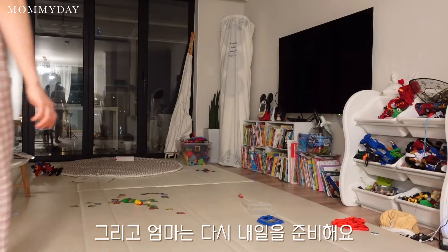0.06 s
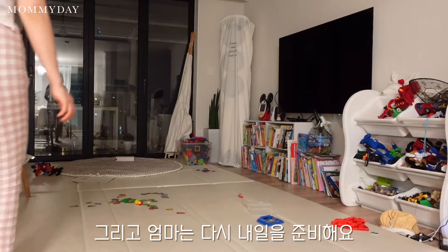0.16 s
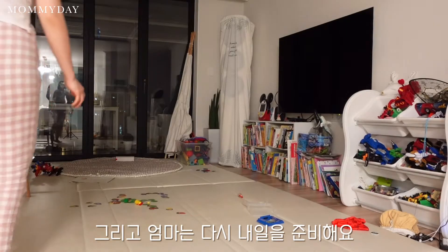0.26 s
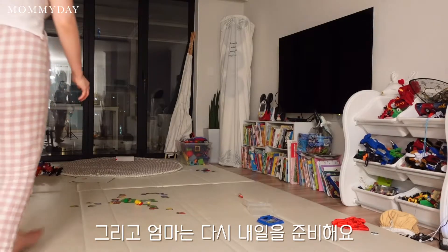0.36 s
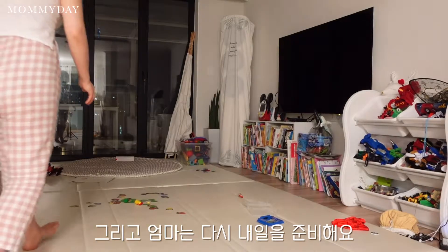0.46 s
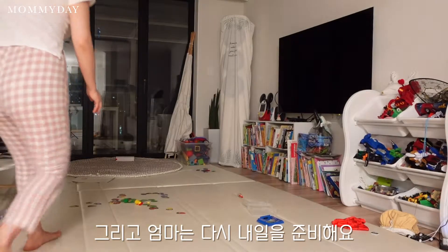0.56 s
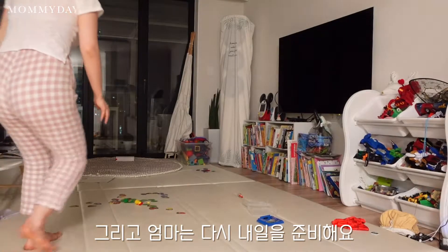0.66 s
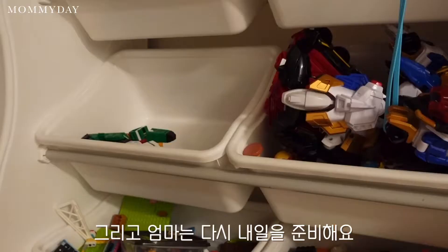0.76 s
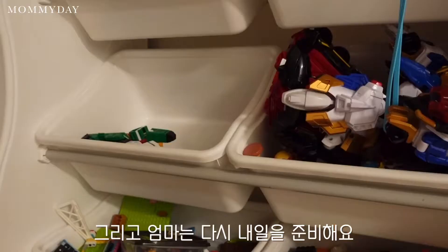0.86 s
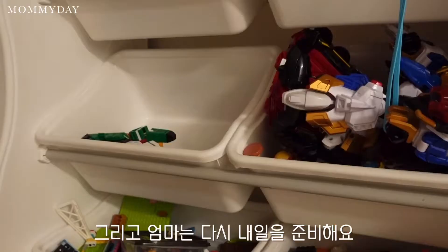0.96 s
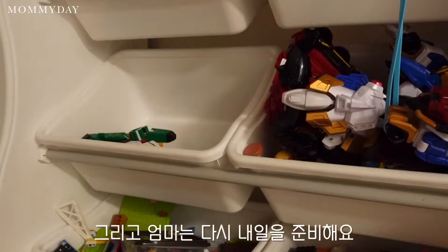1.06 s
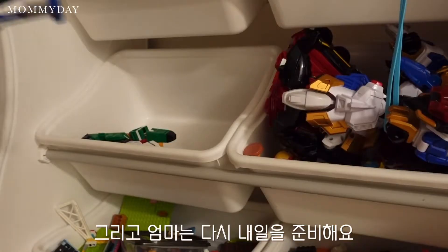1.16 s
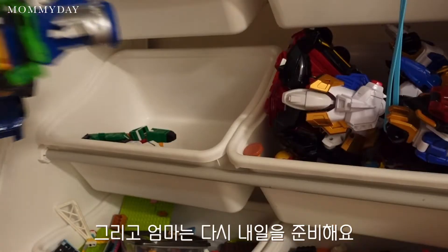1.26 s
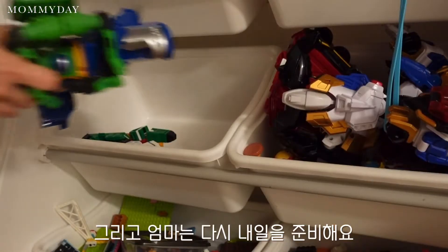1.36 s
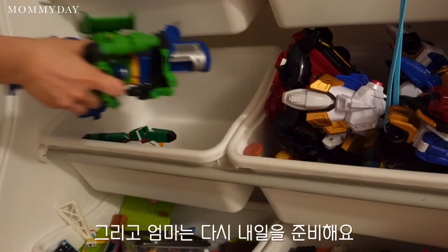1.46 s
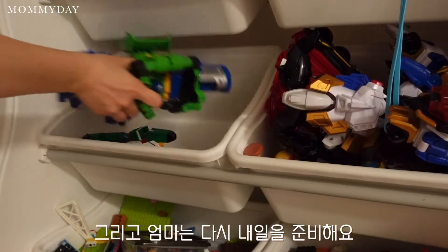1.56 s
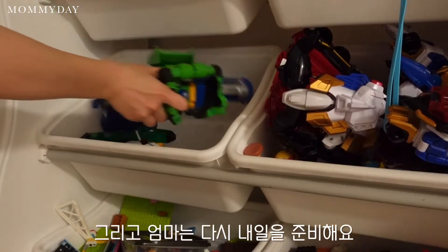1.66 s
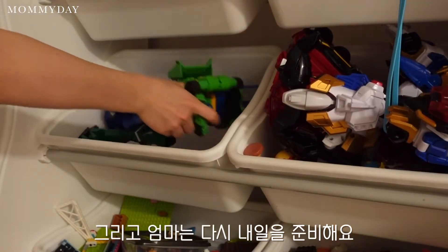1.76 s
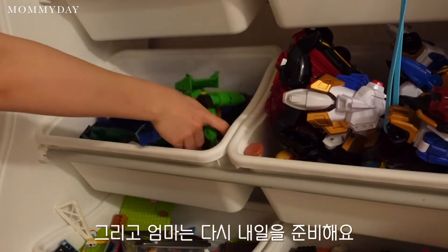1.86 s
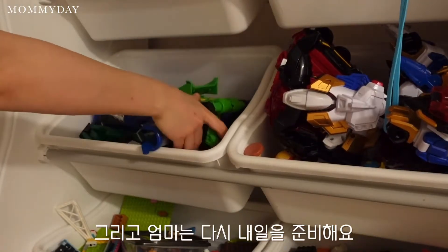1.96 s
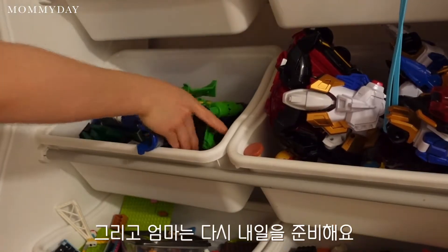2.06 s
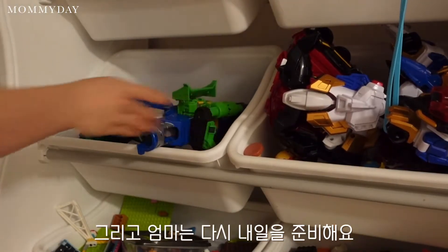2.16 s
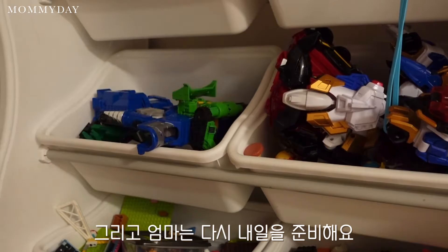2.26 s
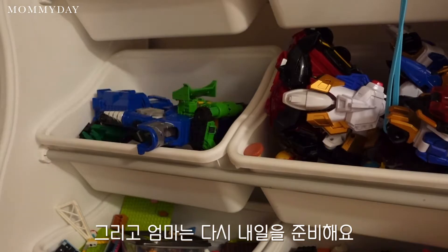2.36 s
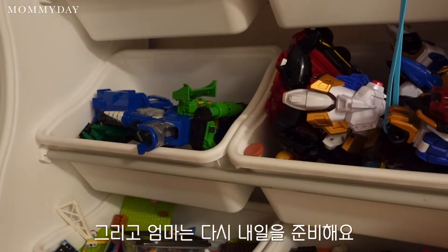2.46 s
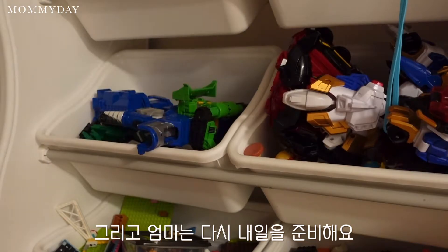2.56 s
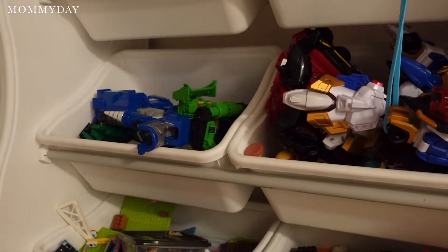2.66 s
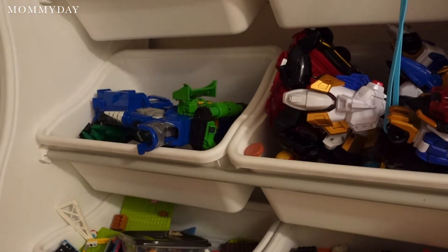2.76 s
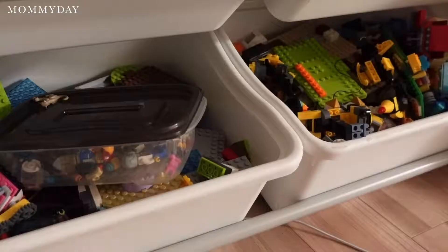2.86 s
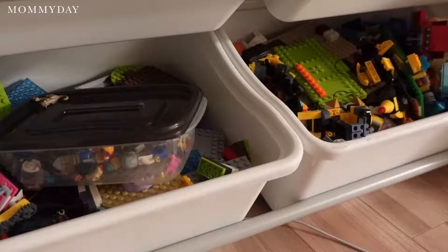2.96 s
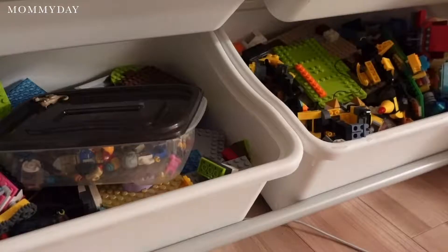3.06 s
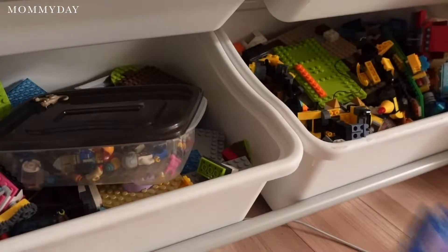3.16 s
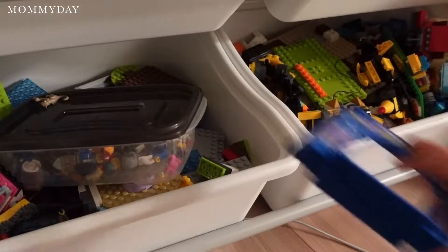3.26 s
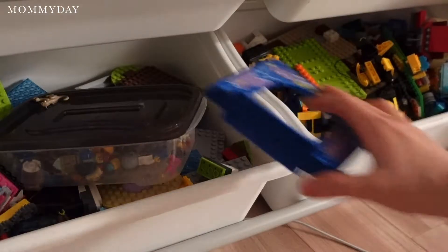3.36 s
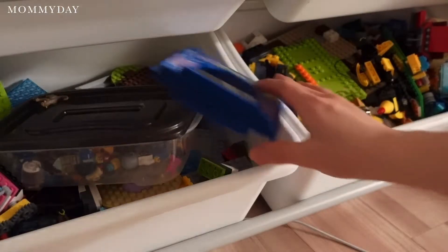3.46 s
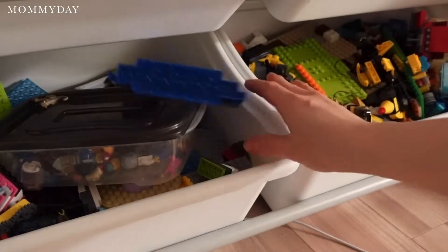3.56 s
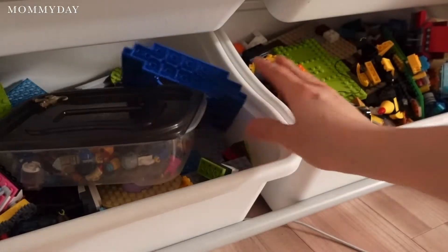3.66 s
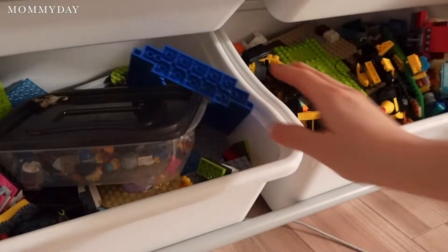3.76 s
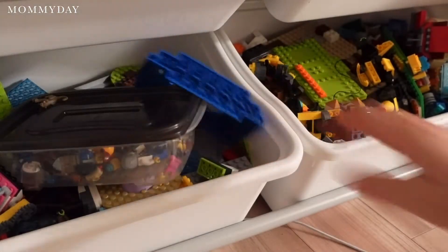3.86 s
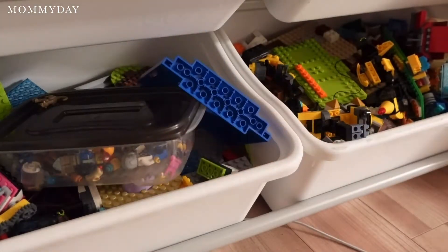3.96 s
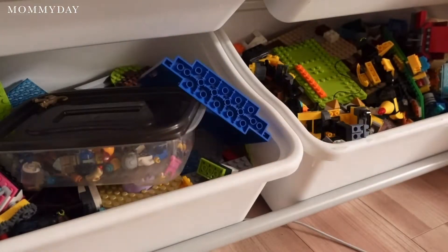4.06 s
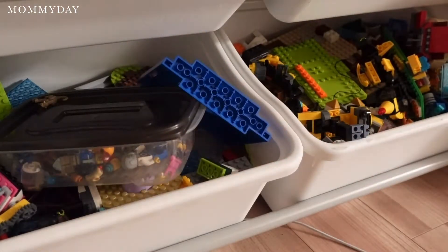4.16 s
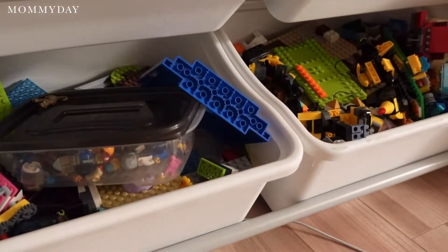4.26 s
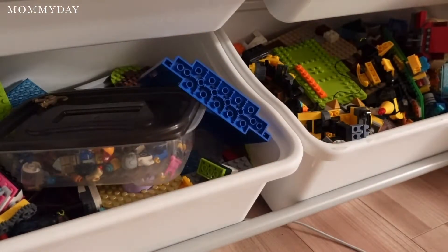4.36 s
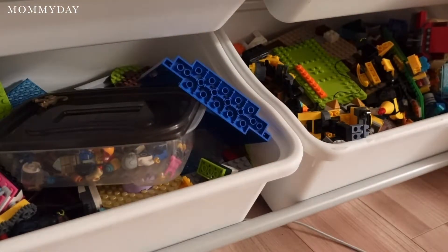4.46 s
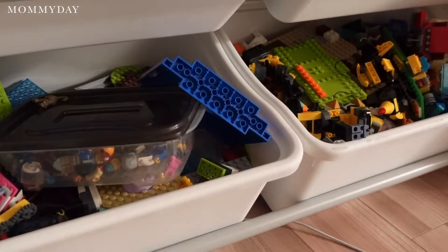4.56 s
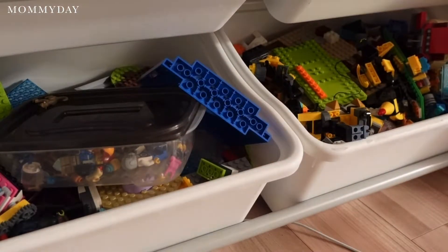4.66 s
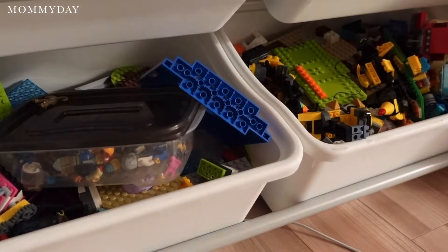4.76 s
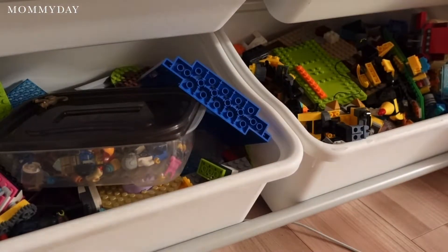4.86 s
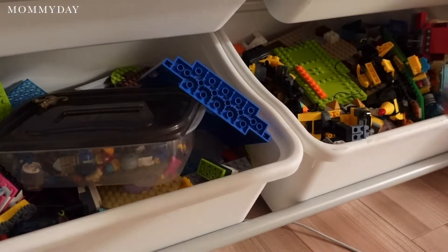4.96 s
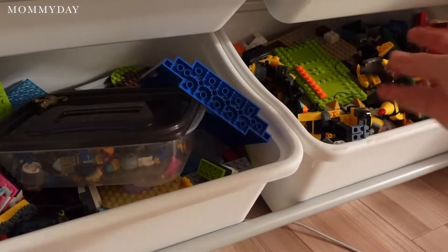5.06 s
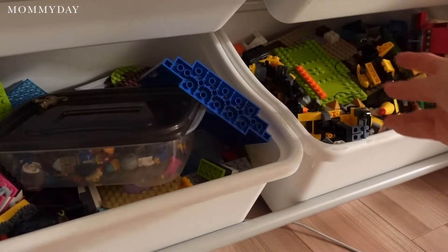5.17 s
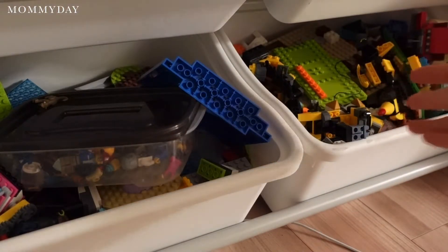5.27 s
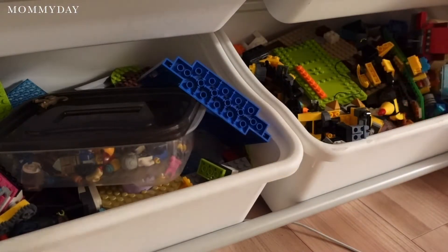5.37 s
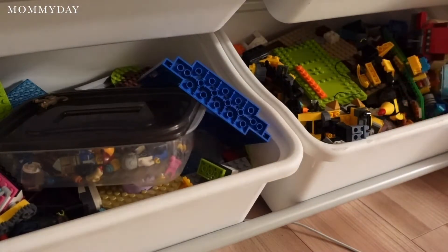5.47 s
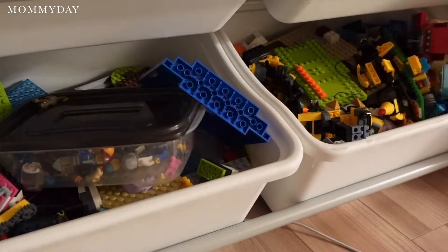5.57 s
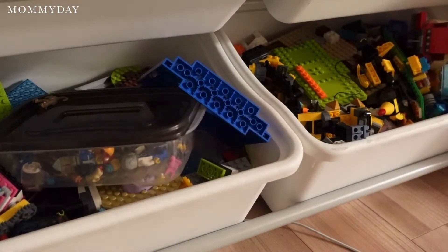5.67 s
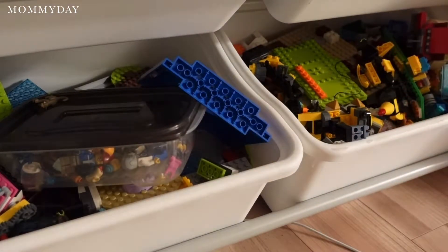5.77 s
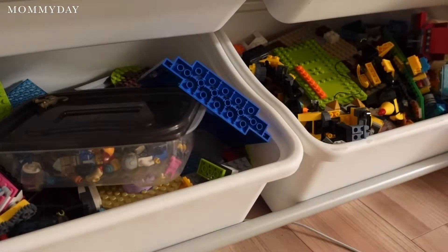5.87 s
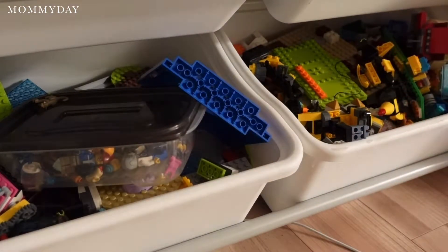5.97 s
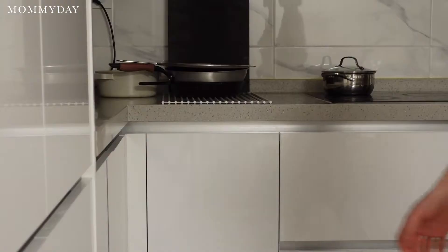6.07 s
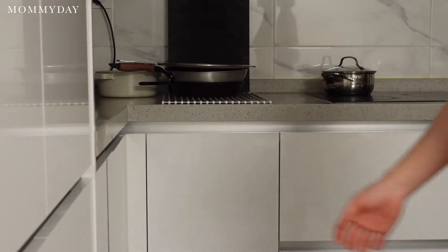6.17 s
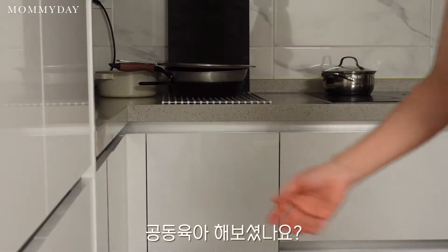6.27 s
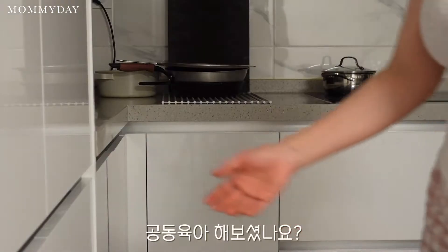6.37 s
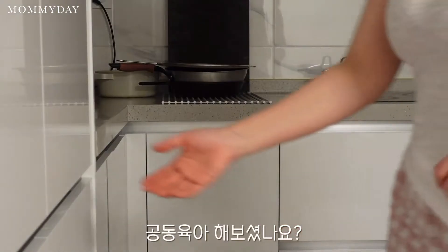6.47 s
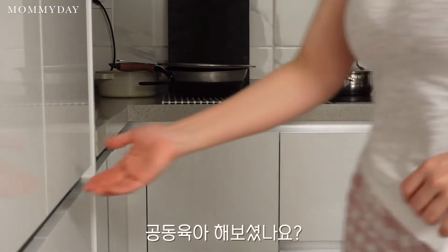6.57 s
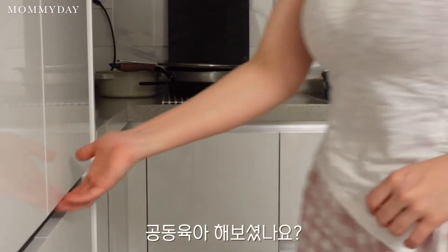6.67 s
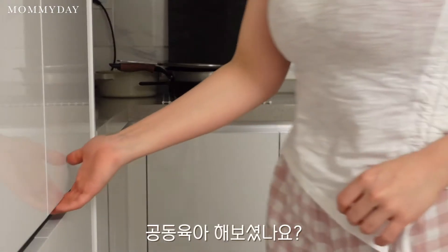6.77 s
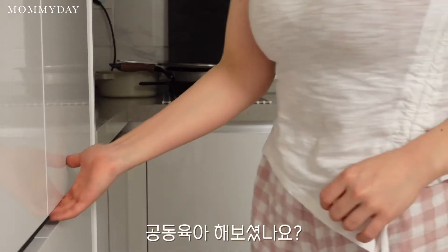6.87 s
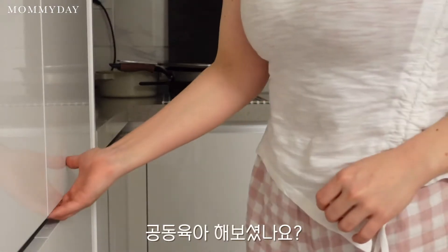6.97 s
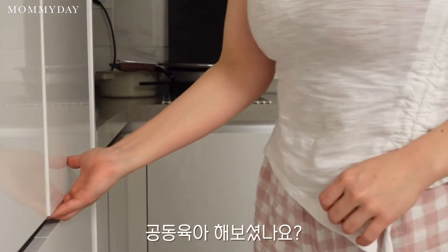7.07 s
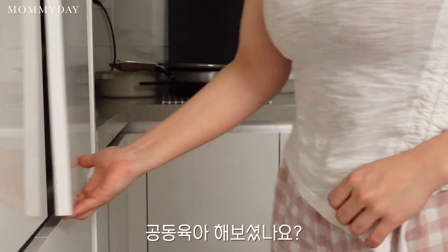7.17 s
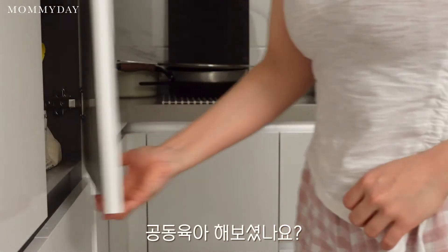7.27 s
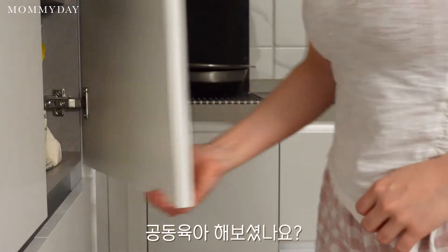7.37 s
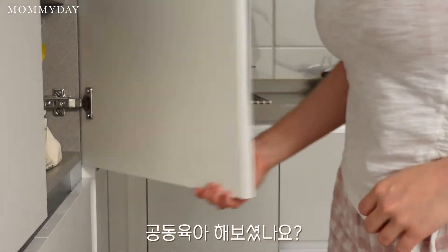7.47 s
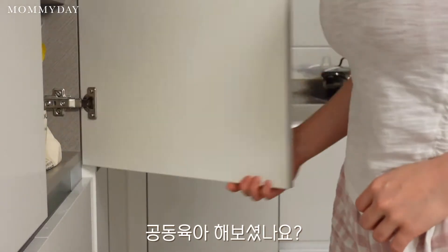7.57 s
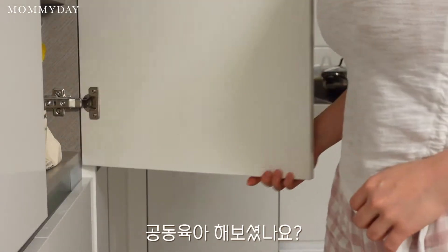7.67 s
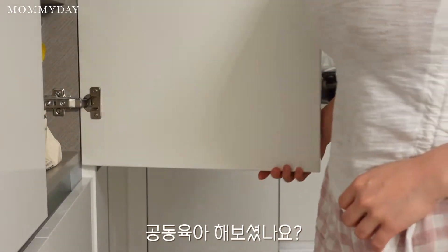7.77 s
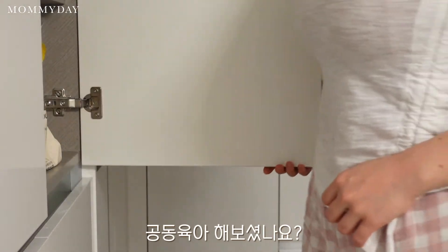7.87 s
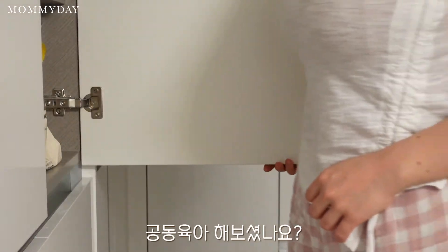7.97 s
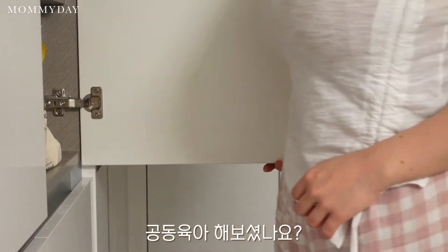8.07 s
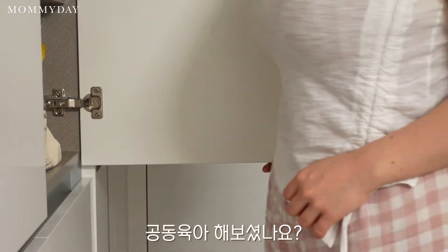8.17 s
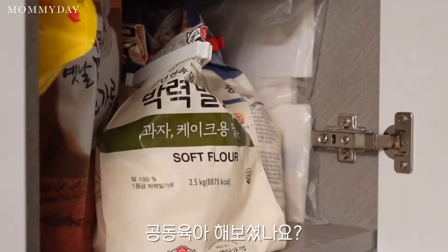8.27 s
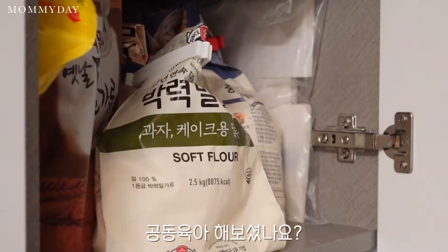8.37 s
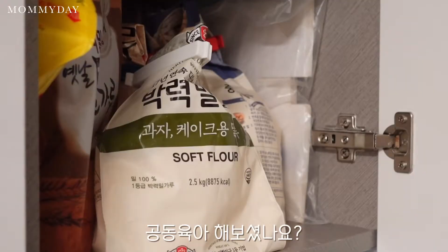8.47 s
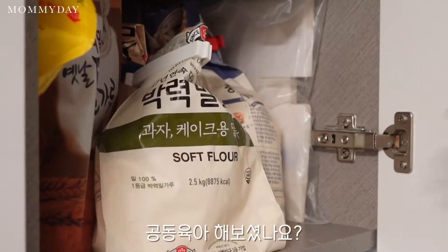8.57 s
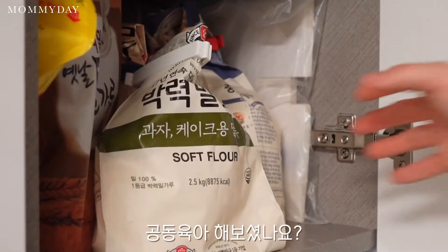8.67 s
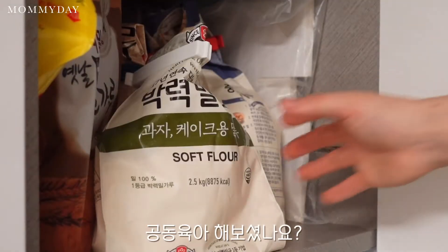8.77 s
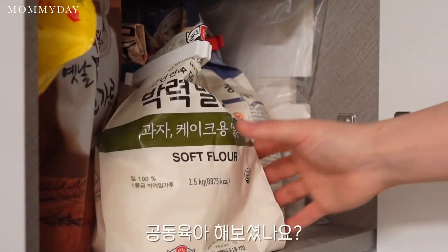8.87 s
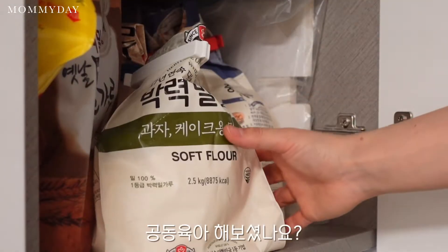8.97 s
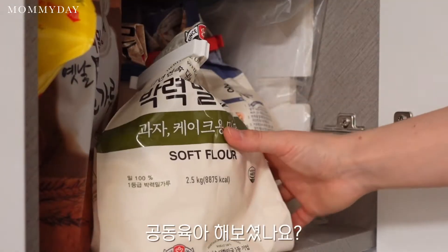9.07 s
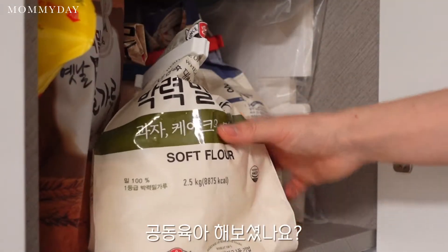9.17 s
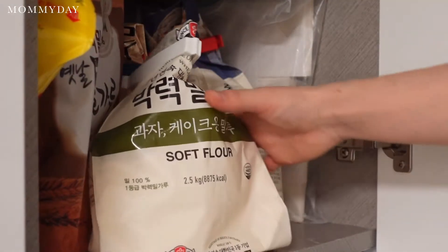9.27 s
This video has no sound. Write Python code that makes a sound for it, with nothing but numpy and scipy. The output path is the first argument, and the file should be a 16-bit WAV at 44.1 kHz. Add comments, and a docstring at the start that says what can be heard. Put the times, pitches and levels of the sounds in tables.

```python
"""A room with plastic storage bins, then a quiet kitchen. Toys are dropped and shuffled in the bins:
impact and friction excite the modes of walls and bricks, and the loudest blows overload the
microphone. A hum sets in and one small brick bounces. In the kitchen a wooden cupboard door knocks
and ticks open, and a hand crumples a paper bag, which buckles in short snaps.
Each source is a force filtered by a resonant body; levels in the tables precede the gains of the mix."""
import sys
import numpy as np
from scipy import signal
from scipy.io import wavfile
from scipy.ndimage import uniform_filter1d

SR = 44100
rng = np.random.default_rng(int(sys.argv[2]) if len(sys.argv) > 2 else 0)


def unload_wav(signal):
    """Save mono or channel-first audio to the path in sys.argv[1] as 16-bit WAV at rate SR, clipped to [-1, 1]."""
    wavfile.write(
        sys.argv[1],
        SR,
        np.round(np.clip(np.atleast_2d(signal).T, -1, 1) * 32767).astype(np.int16),
    )


N = 411453


def amp(db):
    return 10 ** (np.asarray(db) / 20)


def unit_rms(x):
    return x / np.sqrt(np.mean(x ** 2) + 1e-20)


def at_frequency(points, hz):
    """Interpolation of (f, value) points on a logarithmic frequency axis."""
    f, value = np.transpose(points)
    return np.interp(np.log(hz + 1), np.log(f + 1), value)


def add(mix, start, sound):
    """Superposition: the sound joins the mix at start, in seconds."""
    part = mix[..., round(start * SR):][..., :sound.shape[-1]]
    part += sound[..., :part.shape[-1]]


def colour(spectrum):
    """Minimum phase: the causal response of unit energy for a spectrum in dB."""
    db = at_frequency(spectrum, abs(np.fft.fftfreq(4096, 1 / SR)))
    log_gain = np.log(amp(np.maximum(db, -100)))
    taps = np.fft.ifft(np.exp(log_gain - 1j * signal.hilbert(log_gain).imag)).real[:2048]
    return taps / np.linalg.norm(taps)


def body(modes, low_hz, high_hz, broad_db):
    """Modal superposition: damped sines plus a broadband impulse, band-limited, of unit energy."""
    t = np.arange(8192) / SR
    ringing = sum(amp(db) * np.sqrt(width) * np.exp(-np.pi * width * t) * np.sin(2 * np.pi * hz * t)
                  for hz, width, db in modes)
    impulse = amp(broad_db) * (t == 0) * np.sqrt(SR / 2 / (high_hz - low_hz))
    band = signal.butter(3, [low_hz, high_hz], "band", fs=SR, output="sos")
    taps = signal.sosfilt(band, ringing / np.linalg.norm(ringing) + impulse)
    return taps / np.linalg.norm(taps)


def impacts(rows, tick_db, tick_slope, ring_db, thump_db, thud_stretch, ring_q, crack_db, parts_db):
    """Impact excitation: decaying force in three bands (thud, knock, tick), and free ringing."""
    force, rings, t = np.zeros((3, N)), np.zeros(N), np.arange(SR // 6) / SR
    rise = 1 - np.exp(-t / 0.00052)  # contact builds in about half a millisecond
    for start, db, thud_db, hz, t60 in rows:
        band_t60 = t60 * np.array([[thud_stretch], [1], [.8]])
        band_db = np.array([[thud_db], [0], [tick_db + tick_slope * thud_db]])  # light blows tick more
        decay = amp(db + band_db - 60 * t / band_t60)
        burst = decay * rise * rng.standard_normal(decay.shape)
        burst[:, 0] = amp(crack_db) * decay[:, 0]  # the first contact is one hard push
        add(force, start, burst)
        parts_hz = 900 * 8 ** rng.random((5, 1))  # every blow rings other small parts
        add(rings, start, amp(parts_db) * decay[1] * np.sin(2 * np.pi * parts_hz * t).sum(axis=0))
        if hz < 900:  # a wall or floor swings a few clean cycles
            add(rings, start, amp(thump_db) * decay[0] * np.sin(2 * np.pi * hz * t))
        else:  # close modes of a small part overlap in one broad resonance
            resonance = signal.lfilter(*signal.iirpeak(hz, ring_q, SR), burst[1])
            add(rings, start, amp(ring_db) * resonance * np.sqrt(SR * ring_q / hz))
    return force, rings


def friction(curves, rumble_db, rumble_slope, fizz_db, fizz_slope,
             grains_per_s, spread_db, grain_t60, grain_share, grain_onset_db):
    """Friction noise in three bands (rumble, scrape, fizz), breaking into small contacts as it grows."""
    reference_db = -30  # scrape level at which rumble_db and fizz_db are the offsets of their bands
    level_db, t = np.full((3, N), -120.), np.arange(N) / SR
    for curve in curves:
        times, db = np.transpose(curve)
        excess_db = db - reference_db
        span = slice(round(times[0] * SR), round(times[-1] * SR))
        bands_db = [rumble_db + rumble_slope * excess_db, excess_db, fizz_db + fizz_slope * excess_db]
        for band, band_db in enumerate(bands_db):
            level_db[band, span] = np.interp(t[span], times, reference_db + band_db)
    sizes = amp(spread_db * np.minimum(rng.exponential(1, N), 4))
    contacts = sizes * (rng.random(N) < grains_per_s / SR)
    grain_power = abs(signal.oaconvolve(contacts ** 2, amp(-120 * t[:2000] / grain_t60))[:N])
    share = grain_share / (1 + amp(grain_onset_db - level_db[1]))
    power = 1 - share + share * grain_power / grain_power.mean()
    return amp(level_db) * np.sqrt(power) * rng.standard_normal((3, N))


def radiate(force, low_modes, high_modes, treble, low_hz, high_hz, low_broad_db, high_broad_db):
    """Linear response: three force bands drive the low modes, the high modes and a treble spectrum."""
    responses = (body(low_modes, low_hz, 935, low_broad_db),
                 body(high_modes, 900, high_hz, high_broad_db), colour(treble))
    return sum(signal.oaconvolve(band, taps)[:N] for band, taps in zip(force, responses))


# Background noise: start t/s, end t/s, level/dB, spectrum of (f/Hz, density level/dB)
AIR_SPANS = [(0, 2.9, -43, [(18, -72.5), (30, -36), (142, 3), (205, -18), (253, -0.5), (451, -4), (501, -5),
             (1400, -7), (3080, -24), (6440, -28), (16200, -27)]), (2.9, 6.05, -42, [(18, -61), (30, -35),
             (118, -11), (149, -1), (189, -7), (228, -3.5), (463, -20), (635, -11.5), (744, -18.5),
             (1050, -17.5), (1160, -24), (1360, -17), (3330, -35), (14200, -40), (16200, -45.5)]),
             (6.05, 9.4, -48, [(18, -53), (30, -38), (106, -17), (166, -2), (396, -9.5), (744, -11),
             (826, -16.5), (1400, -14), (2250, -22), (14200, -32.5), (16200, -31)])]


def air():
    """Partial coherence: a gently patchy wash of noise, nearly alike in both channels."""
    frames, hz = N // 256 + 5, np.fft.rfftfreq(1024, 1 / SR)
    mid_re, mid_im, side_re, side_im, patches = rng.standard_normal((frames, 513, 5)).T
    patches_db = 0.86 * unit_rms(uniform_filter1d(uniform_filter1d(patches, 10, 0), 16, 1))
    side_db = at_frequency([(60, -10.5), (500, -7), (3000, -4), (12000, -15)], hz)
    mid = mid_re + 1j * mid_im
    side = (side_re + 1j * side_im) * amp(side_db)[:, None]
    out, t = np.zeros((2, N)), np.arange(N) / SR
    for start, end, db, spectrum in AIR_SPANS:
        gain = amp(at_frequency(spectrum, hz)[:, None] + patches_db)
        wash = signal.istft(np.array([mid + side, mid - side]) * gain, nperseg=1024, noverlap=768)[1]
        gate = uniform_filter1d(1. * (t >= start) * (t < end), size=900)
        out += amp(db) * unit_rms(wash[:, :N]) * gate
    return out


# Hum in the room with the bins: t/s, f/Hz, level/dB
HUM_TRACK = [(2.87, 148.3, -44), (4.2, 150.3, -45), (6.05, 149.2, -47.5)]


def hum():
    """A pure tone whose phase is the integral of a slowly drifting frequency."""
    t = np.arange(N) / SR
    times, hz, db = np.transpose(HUM_TRACK)
    cycles = np.cumsum(np.interp(t, times, hz)) / SR
    rms = uniform_filter1d(amp(np.interp(t, times, db, -120, -120)), size=900)
    return rms * np.sqrt(2) * np.sin(2 * np.pi * cycles)


# Reverberation time: f/Hz, T60/s
ROOM_DECAY = [(150, 0.65), (600, 0.23), (2500, 0.34), (8000, 0.059), (15000, 0.13)]


def reverberation(x, side_gain):
    """Diffuse reflection: sparse echoes of random sign, each band absorbed at its own rate."""
    echoes = np.zeros((2, SR // 2))
    grid = np.arange(200, SR // 2 - 20, 20)
    delays = grid + rng.integers(0, 20, (2, len(grid)))
    np.put_along_axis(echoes, delays, rng.choice([-1., 1.], delays.shape), 1)
    hz, t, spectra = signal.stft(echoes, SR, nperseg=256)
    decay = amp(-60 * t / at_frequency(ROOM_DECAY, hz)[:, None])
    mid, side = signal.istft(spectra * decay, SR, nperseg=256)[1]
    tail = np.array([mid + side_gain * side, mid - side_gain * side]) / np.linalg.norm(mid)
    return signal.oaconvolve(x[None], tail, axes=1)[:, :N]


def early_field(x, side_db):
    """Direct sound plus early reflections, which reach the two microphone ports a little differently."""
    taps = rng.standard_normal(400) * amp(-60 * np.arange(400) / SR / .012)
    side = amp(side_db) * signal.oaconvolve(x, taps / np.linalg.norm(taps))[:N]
    return np.array([x + side, x - side])


# Soft swells of hiss: start t/s, duration/s, level/dB
HISS_SWELLS = [(0, 0.092, -51), (0.409, 0.1, -47), (0.536, 0.12, -44.5), (0.724, 0.15, -43),
               (2.716, 0.24, -38.5), (4.666, 0.23, -56.5), (5.756, 0.73, -56), (7.711, 0.086, -53),
               (8.263, 0.29, -55), (8.534, 0.54, -48)]
# Their spectrum: f/Hz, density level/dB
HISS_SPECTRUM = [(1000, -21.5), (3000, -10.5), (6000, -1), (12000, -2), (16000, -4.5)]


def hisses():
    """Amplitude-modulated noise, like cloth brushing skin: each swell rises, holds and fades."""
    envelope = np.zeros(N)
    for start, duration, db in HISS_SWELLS:
        progress = np.arange(0, 1, 1 / SR / duration)
        rise, fall = np.minimum(progress / 0.11, 1), np.minimum((1 - progress) / 0.31, 1)
        add(envelope, start, amp(db) * rise * fall)
    return signal.oaconvolve(envelope * rng.standard_normal(N), colour(HISS_SPECTRUM))[:N]


# Modes of the door: f/Hz, bandwidth/Hz, level/dB
DOOR_MODES = [(182, 36, -18.5), (289.4, 59, 3.5), (620, 81, 2.5), (1500, 180, -5), (1890, 300, 5),
              (2300, 250, -1), (4400, 400, -14.5)]
# Treble crackle of both door and paper: f/Hz, density level/dB
CRACKLE_SPECTRUM = [(2350, -29), (4000, -1), (4280, -2), (4750, -1), (6510, -4), (15700, -11.5)]
# Knocks of the door: t/s, level/dB, thud re knock/dB, ring f/Hz, T60/s
DOOR_KNOCKS = [(6.635, -24, -8.5, 289, 0.25), (7.1145, -19, -8, 2300, 0.026), (7.295, -39, -13, 2290, 0.05),
               (7.325, -33, -13, 2300, 0.054), (7.339, -32, -19, 1780, 0.15)]
# Ticks of the hinge: t/s, level/dB, thud re knock/dB, ring f/Hz
HINGE_TICKS = [(6.061, -39, -24, 2050), (7.056, -42, -9, 1500), (7.3424, -31, -10, 4350),
               (7.409, -28.5, -18, 2600), (7.463, -36.5, -4, 2600), (7.51, -46, -15, 4500),
               (7.626, -39.5, -22, 4140)]
# Friction of the hand and of the swing, one curve each: t/s, level/dB
DOOR_SWING = [
    [(6.636, -32), (6.722, -43), (7.016, -54), (7.116, -44.5)],
    [(7.116, -30), (7.264, -49), (7.356, -44.5), (7.85, -62.5)],
]


def cupboard_door():
    """Forced vibration of a damped wooden panel under knocks, hinge ticks and rubbing."""
    tick_t60 = 0.036
    knocks, knock_rings = impacts(DOOR_KNOCKS, tick_db=-21, tick_slope=-0.099, ring_db=-6.5,
                                  thump_db=-7, thud_stretch=3.9, ring_q=6, crack_db=6, parts_db=-28)
    ticks, tick_rings = impacts([(*row, tick_t60) for row in HINGE_TICKS],
                                tick_db=15, tick_slope=-0.14, ring_db=-6.5, thump_db=-3,
                                thud_stretch=1.1, ring_q=5.3, crack_db=9.5, parts_db=-26)
    rubbing = friction(DOOR_SWING, rumble_db=0.5, rumble_slope=1, fizz_db=-11.5, fizz_slope=0.57,
                       grains_per_s=220, spread_db=-12, grain_t60=0.018,
                       grain_share=0.55, grain_onset_db=-41)
    force = amp(-19.5) * (knocks + ticks) + amp(-3.5) * rubbing
    panel = radiate(force, DOOR_MODES, DOOR_MODES, CRACKLE_SPECTRUM,
                    low_hz=128, high_hz=2900, low_broad_db=-1.5, high_broad_db=7.5)
    return panel + knock_rings + tick_rings


# Modes of the bag: f/Hz, bandwidth/Hz, level/dB
BAG_MODES = [(256.5, 91, 7), (810, 230, 4), (1398, 196, -18.5), (2300, 340, -5.5), (3540, 1500, 8.5)]
# Snaps of the paper: t/s, level/dB, thud re knock/dB, ring f/Hz
BAG_SNAPS = [(8.883, -25, -27, 4500), (8.892, -30, -22, 5000), (8.912, -24, -8, 2300),
             (8.959, -32, -15, 3500), (8.9764, -23, -9, 2120), (9, -23, -8, 890), (9.051, -17, -19, 2000),
             (9.065, -4.5, -12.5, 2480), (9.107, -10.5, -7, 1800), (9.114, -13, -7, 2120),
             (9.1465, -3, -8, 2530), (9.2248, -17, -17, 2030), (9.231, -14, -9, 2500),
             (9.244, -23.5, 4, 366)]
# Friction as the bag is touched, then gripped: t/s, level/dB
BAG_RUSTLE = [
    [(8.54, -68), (8.556, -53), (8.59, -73), (8.878, -60.5), (8.995, -46), (9.015, -34), (9.115, -29),
     (9.33, -34)],
]


def paper_bag():
    """Buckling of a thin sheet: short snaps and a fine, bright rustle excite the bag."""
    snap_t60 = 0.019
    snaps, rings = impacts([(*row, snap_t60) for row in BAG_SNAPS],
                           tick_db=-5, tick_slope=-0.22, ring_db=-15, thump_db=-14,
                           thud_stretch=1.43, ring_q=6, crack_db=11, parts_db=-21)
    rustle = friction(BAG_RUSTLE, rumble_db=-9, rumble_slope=0.98, fizz_db=2, fizz_slope=0.6,
                      grains_per_s=75, spread_db=-3, grain_t60=0.011,
                      grain_share=0.19, grain_onset_db=-32)
    return rings + radiate(amp(-1.5) * snaps + rustle, BAG_MODES, BAG_MODES, CRACKLE_SPECTRUM,
                           low_hz=165, high_hz=4940, low_broad_db=7.5, high_broad_db=2)


# Contacts of one dropped brick: t/s, level/dB
BRICK_BOUNCES = [(5.156, -0.5), (5.188, -10.5), (5.215, -10), (5.226, -21)]
# Its modes: f/Hz, bandwidth/Hz, level/dB
SMALL_BRICK_MODES = [(2970, 450, -3.5), (4800, 89, -14), (5450, 120, 14), (6500, 400, -13), (8700, 108, 7),
                     (8800, 150, 15), (10250, 440, -2)]
# Its crack: f/Hz, density level/dB
CRACK_SPECTRUM = [(88, -30), (150, -7.5), (725, -5.5), (848, -5), (1140, -3.5), (2000, -6), (4150, -7.5),
                  (4600, -0.5), (5600, -2), (7550, -8), (7950, 3), (10300, 1.5), (11200, -5.5),
                  (16000, -12)]


def small_brick():
    """Inelastic bouncing: contacts come ever closer together, each a crack with high modes ringing."""
    force, t = np.zeros(N), np.arange(SR // 2) / SR
    decay = amp(5.5 - 60 * t / 0.054) + amp(-5 - 60 * t / 0.4)  # fast crack, slower chatter
    rise = 1 - np.exp(-t / 0.0008)
    for start, db in BRICK_BOUNCES:
        add(force, start, amp(db - 17) * decay * rise * rng.standard_normal(len(t)))
    first_click = amp(-7 - 60 * t / .012) * np.diff(rng.standard_normal(len(t) + 1))
    ringing = body(SMALL_BRICK_MODES, 2030, 21500, broad_db=-23)[:2048]
    out = signal.oaconvolve(force, colour(CRACK_SPECTRUM) + amp(-15) * ringing)[:N]
    add(out, BRICK_BOUNCES[0][0], first_click)
    return out


# Clean notes of struck bin wall, bricks and door: t/s, f/Hz, level/dB, T60/s
STRUCK_NOTES = [(.808, 620, -33, 0.093), (1.1262, 316, -1.5, 0.046), (2.6875, 333, -4.5, 0.04),
                (1.54, 141.7, -15.5, 0.65), (1.83, 150, -9, 0.13), (1.799, 1700, -4.5, 0.15),
                (3.45, 3268, -5.5, 0.17), (3.465, 2760, -6.5, 0.11), (3.52, 2800, -1, 0.075),
                (3.518, 828, 1, 0.054), (3.885, 2900, -25, 0.057), (1.9124, 1445, -1.5, 0.037),
                (5.1556, 8225, -13, .07), (5.157, 9150, -13.5, .07), (6.70, 600, -37.5, 0.35),
                (7.115, 2000, -14.5, 0.046), (7.114, 1580, -12, 0.021), (5.156, 4800, -13, 0.06),
                (5.1565, 5300, -18, .05), (1.922, 3480, -3, .05), (3.567, 3900, -11, .045),
                (6.639, 74.96, -46.5, 0.44), (7.13, 91, -45, 0.37), (7.15, 50, -49, .6),
                (1.159, 3700, -0.5, 0.06)]


def struck_notes():
    """Free vibration of single modes: sines that build over a few cycles and decay exponentially."""
    out, t = np.zeros(N), np.arange(SR // 2) / SR
    for start, hz, db, t60 in STRUCK_NOTES:
        rise = 1 - np.exp(-t * hz / 1.5)
        add(out, start, amp(db - 60 * t / t60) * rise * np.sin(2 * np.pi * hz * t))
    return out


# Hollow notes of the bin: t/s, duration/s, f/Hz, level/dB
BIN_BOOMS = [(1.582, .062, 136.6, -8), (1.583, 0.024, 231.6, -7.5), (1.588, .05, 418, -12.5),
             (1.649, 0.022, 262, -11), (1.69, 0.023, 609, -0.5), (1.799, 0.015, 593, -5.5),
             (1.833, .024, 629, -6.5), (1.49, 0.014, 1054, -6.5), (1.12, 0.012, 1482, -7.5),
             (1.932, 0.029, 560, -13), (3.666, 0.018, 399, -8)]


def bin_booms():
    """Contact damping: the wall sounds while a toy presses on it and is choked when the toy shifts."""
    out = np.zeros(N)
    for start, duration, hz, db in BIN_BOOMS:
        progress = np.arange(0, 1, 1 / SR / duration)
        cycles = hz * duration * (progress - 0.016 * progress ** 2)  # the pitch sags by about 3 %
        add(out, start, amp(db) * signal.windows.tukey(len(progress), .4) * np.sin(2 * np.pi * cycles))
    return out


# Modes of the bin and of the bricks in it: f/Hz, bandwidth/Hz, level/dB
BIN_MODES = [(233, 20, -7.5), (320, 51, 3.5), (455, 20, -13.5), (561.4, 32, -3), (669, 26, 3.5),
             (790, 81, 0.5)]
BRICK_MODES = [(1090, 160, -12), (1510, 160, 1.5), (1834, 110, -5.5), (2210, 160, 2), (2846, 760, 2.5),
               (3730, 550, -4.5), (4150, 280, 2.5), (5400, 130, -12)]
# Tick of plastic on plastic: f/Hz, density level/dB
TICK_SPECTRUM = [(2350, -31.5), (4000, -10), (4480, -11.5), (5450, 5), (12800, -3.5), (15100, -9),
                 (16200, -9.5)]
# Blows of the toys: t/s, level/dB, thud re knock/dB, ring f/Hz, T60/s
TOY_BLOWS = [(0.425, -35.5, 8, 1500, 0.085), (0.5597, -28, 0, 433, 0.078), (0.5863, -27.5, 4.5, 685, 0.064),
             (0.8087, -29, 14, 620, 0.064), (0.8597, -29, 1, 550, 0.16), (0.903, -22.5, -26.5, 4800, 0.032),
             (0.9457, -35, 2.5, 2500, 0.099), (1.0258, -33.5, -1, 1380, 0.26), (1.092, -5, -25, 1380, 0.13),
             (1.1193, -2, -22, 1500, 0.043), (1.1344, -5, -16, 2160, 0.028), (1.1584, -4, -18, 3240, 0.13),
             (1.2219, -8, -5, 2900, 0.061), (1.2437, -12, -6, 2950, 0.21), (1.2716, -7.5, -6, 863, 0.11),
             (1.301, -6.5, -4, 2100, 0.087), (1.3915, 3.5, -20, 2600, 0.035),
             (1.4098, -7.5, -36, 3540, 0.13), (1.489, 7.5, -0.5, 1560, 0.048),
             (1.5083, -8.5, -42, 297, 0.31), (1.5826, 5, -1, 225, 0.12), (1.6401, 4, -4, 264.8, 0.26),
             (1.6786, 3.5, -6.5, 746, 0.15), (1.6993, 0, 3, 567, 0.074), (1.718, -7, -44, 621, 0.19),
             (1.7455, -1, 4, 886, 0.079), (1.765, -8, 6, 1810, 0.15), (1.7955, 5.5, 4, 575, 0.066),
             (1.826, -11, 7, 1105, 0.039), (1.8441, -10, 7, 282, 0.048), (1.914, -4, 5, 1500, 0.092),
             (1.921, -3.5, -6, 3300, 0.045), (1.9341, -6.5, 6.5, 514, 0.1), (2.0336, -26, 8, 268, 0.26),
             (2.05, -23, 3, 6500, 0.064), (2.2358, -28.5, 3.5, 2520, 0.085),
             (2.3975, -33.5, 12.5, 424, 0.1), (2.4367, -26.5, -2, 1870, 0.063), (2.4628, -29, 6, 412, 0.11),
             (2.4791, -27.5, 8, 196, 0.1), (2.5118, -27.5, -3, 1890, 0.24), (2.686, -18, 7.5, 329, 0.05),
             (2.7202, -23, -19, 3730, 0.069), (2.7517, -25, -12, 1320, 0.3), (2.8676, -31, -27, 2500, 0.15),
             (3.4237, 2.5, -11.5, 650, 0.037), (3.464, 4, -8, 5270, 0.054),
             (3.5166, 3.5, -2.5, 2110, 0.059), (3.5628, 1.5, -8, 5040, 0.064), (3.6019, -7, 0, 292, 0.085),
             (3.613, 1.5, -6, 320, 0.045), (3.6333, -1, -5.5, 320, 0.11), (3.6656, 2.5, -2.5, 350, 0.072),
             (3.6874, 0, -14, 5400, 0.057), (3.7392, -5, 6.5, 455, 0.036), (3.7689, -7, 6, 467, 0.048),
             (3.79, -11.5, 4, 394, 0.019), (3.8359, -15.5, 0, 346, 0.095), (3.8591, -2.5, 1.5, 790, 0.041),
             (3.8852, -10, 3, 2610, .08), (3.899, -17, -14, 4000, 0.027), (3.9355, -17, 0, 1090, 0.047)]
# Sliding and rattling, one curve for each handling: t/s, level/dB
TOY_SHUFFLE = [
    [(0.0, -39.5), (0.104, -49), (0.3, -73)],
    [(0.41, -50), (0.6, -37.5), (0.72, -52)],
    [(0.73, -38), (0.898, -41), (1.085, -48)],
    [(1.093, -8.5), (1.333, -28), (1.635, -14), (1.645, -9), (1.85, -13.5), (1.862, -23), (1.911, -27),
     (1.915, -7.5), (1.973, -24.5), (2.3, -56)],
    [(2.33, -47.5), (2.402, -38), (2.646, -39), (2.682, -29.5), (2.87, -38.5), (2.982, -47.5), (3.424, -45)],
    [(3.425, -16), (3.645, -17.5), (3.851, -35.5), (3.859, -26), (4.05, -50)],
]


def toys():
    """Impact and friction drive the low modes of the bin walls and the high modes of the bricks."""
    blows, rings = impacts(TOY_BLOWS, tick_db=-6, tick_slope=-0.25, ring_db=-10.5, thump_db=-6,
                           thud_stretch=1.11, ring_q=6.5, crack_db=6, parts_db=-23)
    sliding = friction(TOY_SHUFFLE, rumble_db=-0.5, rumble_slope=0.78, fizz_db=-4.5, fizz_slope=0.98,
                       grains_per_s=190, spread_db=1.5, grain_t60=0.04,
                       grain_share=0.607, grain_onset_db=-38)
    force = amp(-6) * blows + amp(-5.5) * sliding
    return rings + radiate(force, BIN_MODES, BRICK_MODES, TICK_SPECTRUM,
                           low_hz=184.6, high_hz=5110, low_broad_db=12, high_broad_db=8)


# Stereo balance: t/s, level of left re right/dB
BALANCE = [(0.26, -1), (0.78, 2.5), (2.31, -1.5), (2.6, 5), (3.0, -1), (3.5, 0), (4.2, -1.5), (8.6, -0.5),
           (9.33, 0)]


def scene():
    """Superposition of sources, reflections and background, placed by the level between channels."""
    bass_cut = signal.butter(4, 115, "high", fs=SR, output="sos")  # small bodies radiate little bass
    struck = signal.sosfilt(bass_cut, toys() + cupboard_door() + paper_bag() + small_brick())
    direct = struck + struck_notes() + bin_booms() + hisses()
    field = early_field(direct, side_db=-32) + amp(-12.5) * reverberation(direct, side_gain=0.099)
    balance_db = np.interp(np.arange(N) / SR, *np.transpose(BALANCE))
    return (field + air() + hum()) * amp([balance_db / 2, -balance_db / 2])


def record(dry):
    """Overload: the microphone drops the deepest bass, clips the loudest blows and limits the band."""
    low_hz, high_hz = 45, 16100
    thinned = signal.sosfilt(signal.butter(2, low_hz, "high", fs=SR, output="sos"), dry)
    clipped = np.clip(thinned, -.99, .99)
    lowpass = signal.firwin(511, high_hz, window=("kaiser", 9), fs=SR)
    return signal.oaconvolve(clipped, lowpass[None], "same")


dry = scene()
out = record(dry)
unload_wav(out)
```